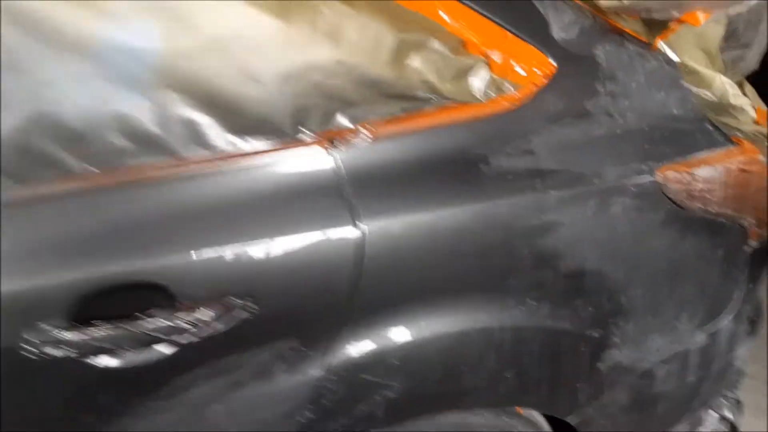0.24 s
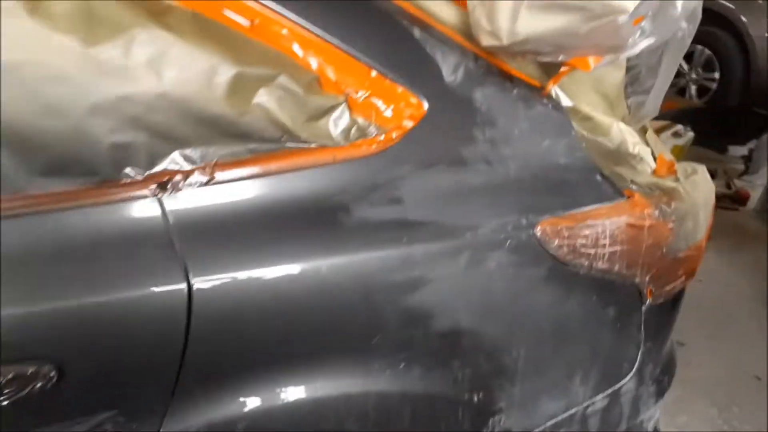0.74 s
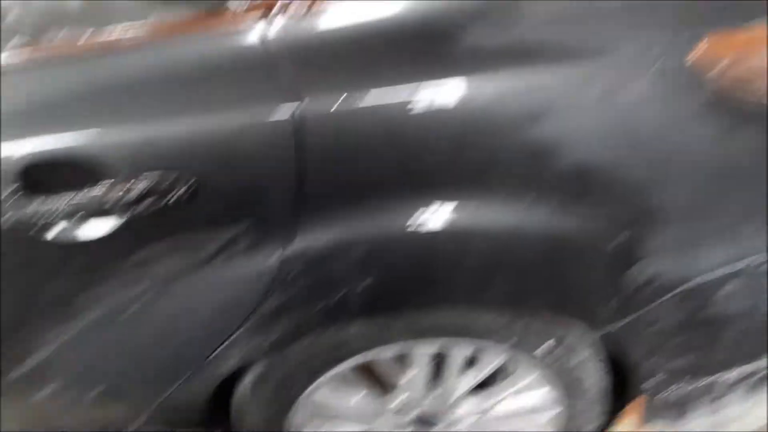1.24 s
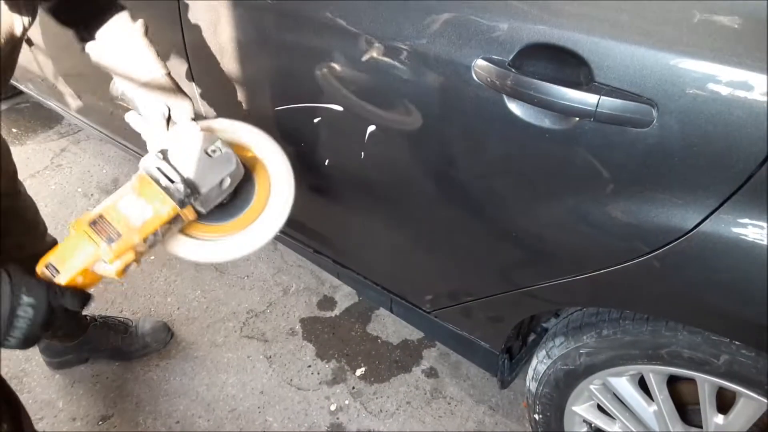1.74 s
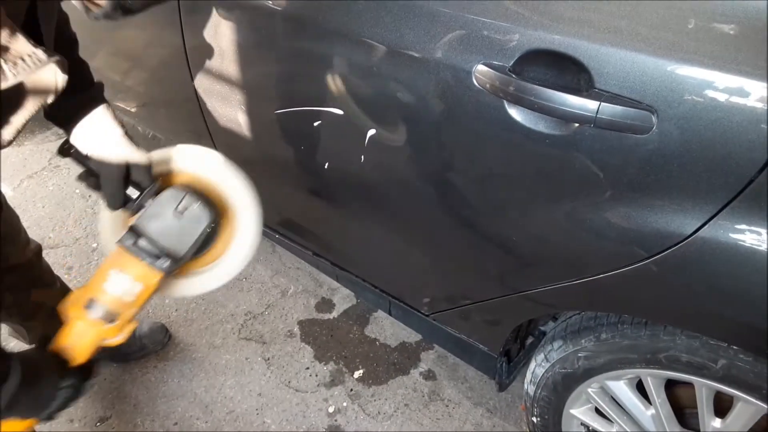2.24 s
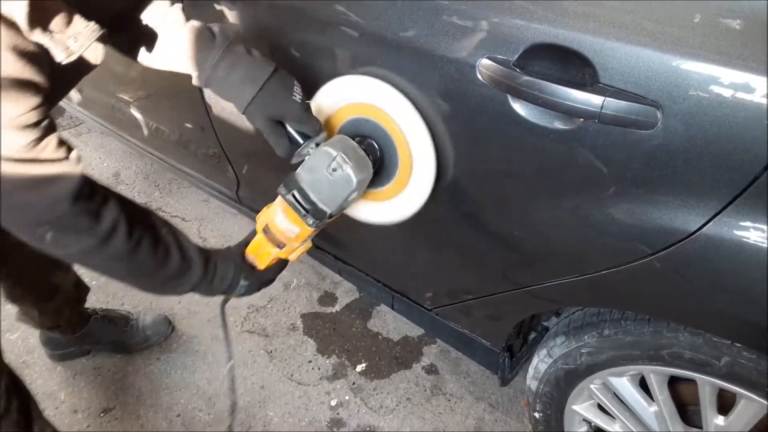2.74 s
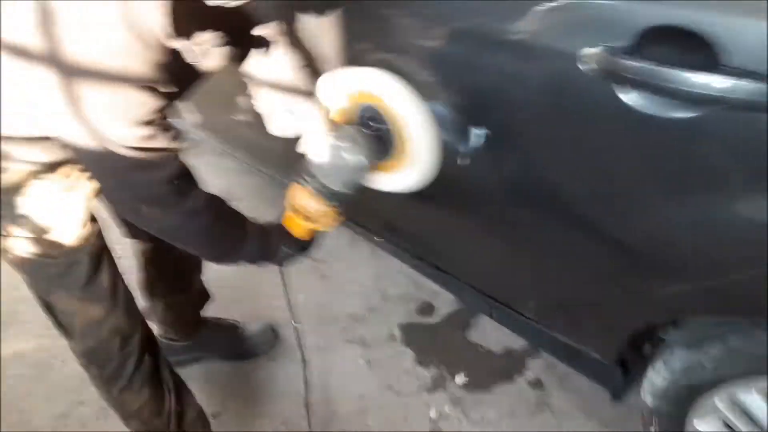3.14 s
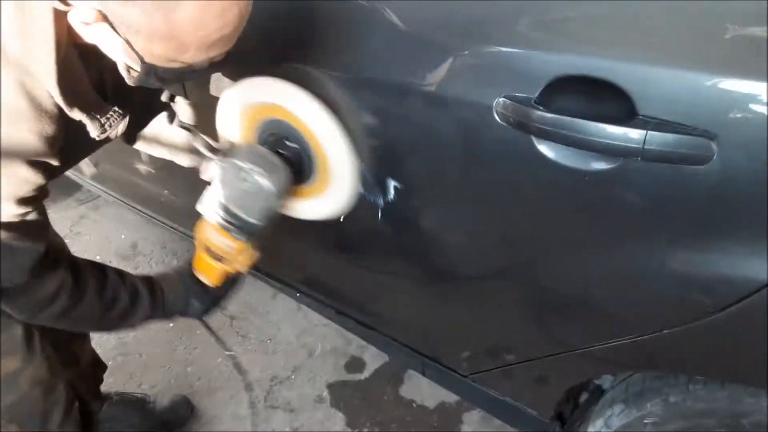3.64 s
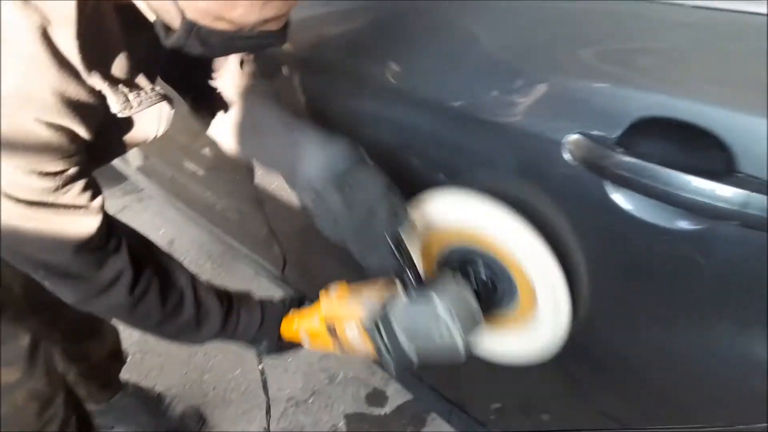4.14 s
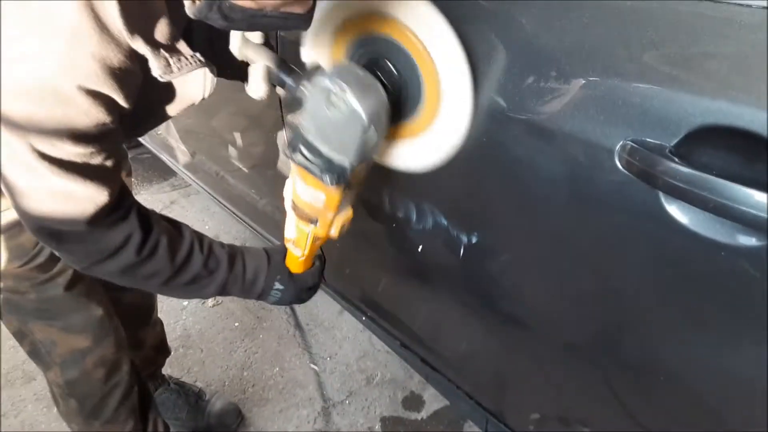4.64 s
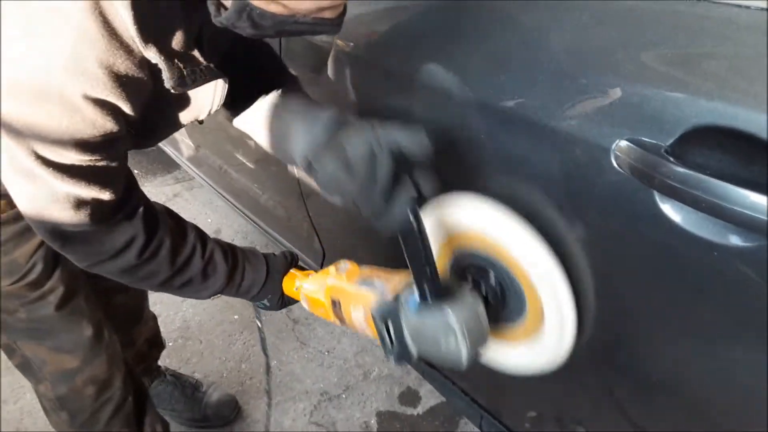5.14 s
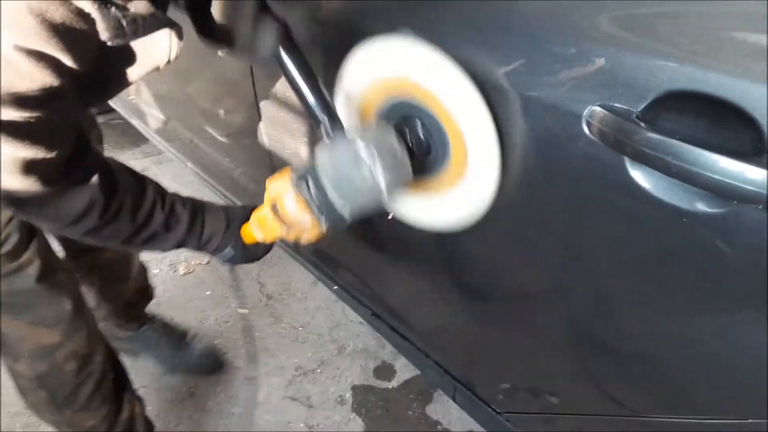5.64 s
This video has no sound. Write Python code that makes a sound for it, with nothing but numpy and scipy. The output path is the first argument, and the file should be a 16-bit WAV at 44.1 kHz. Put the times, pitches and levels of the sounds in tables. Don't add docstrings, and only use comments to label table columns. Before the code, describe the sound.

Low workshop hum and a few footstep scrapes give way suddenly to the loud, steady, wavering whir of an electric polisher on car paint.

```python
import sys
import numpy as np
from scipy import signal
from scipy.fft import rfft, irfft, next_fast_len
from scipy.io import wavfile
from scipy.ndimage import uniform_filter1d, map_coordinates

SR = 44100
rng = np.random.default_rng(int(sys.argv[2]) if len(sys.argv) > 2 else 0)


def magnitude_from_level(level_db):
    exponent = np.asarray(level_db, float) / 20
    return 10 ** exponent


def file_out(sig):
    cols = np.atleast_2d(sig).T
    lim = np.clip(cols, -1, 1)
    pcm = np.round(lim * 32767).astype(np.int16)
    wavfile.write(sys.argv[1], SR, pcm)


N = 260190
T = np.arange(N) / SR
MAINS_HZ = 120

# [f/Hz, correlation]
SHOP_ALIKE = [(60, 0.35), (130, 0.98), (290, 0.85), (640, 0.49), (1410, -0.04), (3100, 0.021), (6820, 0.0),
              (15000, 0.024)]
# [f/Hz, correlation]
TOOL_ALIKE = [(60, 0.19), (130, 0.69), (290, 0.78), (640, 0.76), (1410, 0.29), (3100, 0.042),
              (6820, 0.0084), (15000, 0.01)]
# [t/s, length/s, extra hunting/dB]
HUNTS = [
    (1.45, .2, 4),
    (3.08, .3, 7),
    (4.52, .36, 3),
    (5.2, .2, 5),
]


def unit(x):
    return x / np.sqrt(np.mean(x ** 2) + 1e-20)


def along(points, hz):
    f, v = np.transpose(points)
    return np.interp(np.log(hz + 1), np.log(f + 1), v)


def curves(rows):
    s, *cols = np.transpose(rows)
    return [np.interp(T, s, c) for c in cols]


def wobble(rate):
    return map_coordinates(rng.standard_normal(N // 400), [T * rate])


def swells(rows, rest_db):
    bumps = sum(magnitude_from_level(db) * np.exp(-np.abs(2 * (T - s) / length) ** 3) for s, length, db in rows)
    return 20 * np.log10(magnitude_from_level(rest_db) + bumps)


def filtered(x, response):
    m = next_fast_len(N + 8192)
    return irfft(rfft(x, m) * response(np.fft.rfftfreq(m, 1 / SR)), m)[..., :N]


def rush(spectrum, alike, patchy_db, gate=1.0):
    def mid_side_share(hz):
        turn = np.arccos(np.clip(along(alike, hz), -1, 1)) / 2
        return np.array([np.cos(turn), np.sin(turn)])

    mid, side = filtered(gate * rng.standard_normal((2, N)), mid_side_share)
    z = signal.stft(np.array([mid + side, mid - side]), nperseg=512)[2]
    field = uniform_filter1d(rng.standard_normal(z.shape), size=3, axis=1)
    field = uniform_filter1d(field, size=20, axis=2)
    field = field + field.mean(axis=0) * 0.5
    gain = magnitude_from_level(patchy_db * np.clip(unit(field), -2.5, 2.5))
    patched = signal.istft(z * gain, nperseg=512)[1][:, :N]
    return unit(filtered(patched, lambda hz: magnitude_from_level(along(spectrum, hz))))


def tone(phase, db, side_db, sway_db, shiver=.6):
    mid = magnitude_from_level(db + 3) * np.sin(phase + rng.uniform(0, 6) + shiver * wobble(25))
    side = magnitude_from_level(side_db + 5.5 + sway_db * wobble(4.95)) * np.sin(phase + 1.95 * wobble(2.946))
    return np.array([mid + side, mid - side])


def buffer():
    # [t/s, f/Hz]
    shaft = [(1.39, 175), (2.4, 175.2), (2.52, 174.6), (2.6, 175.1), (2.95, 174.6), (3.06, 172.4),
             (3.43, 171.4), (3.62, 172.8), (3.72, 171.8), (3.9, 171.8), (4.1, 173.6), (4.4, 173.6),
             (4.55, 171), (4.65, 171.6), (5.0, 172.2), (5.1, 173), (5.45, 173.6), (5.9, 173)]
    free_hz = 175
    load = free_hz - curves(shaft)[0]
    hunting = magnitude_from_level(swells(HUNTS, 0)) * (.17 * wobble(18) + .42 * wobble(60))
    shaft_hz = free_hz - load + hunting + .2 * wobble(8)
    turn = 2 * np.pi * np.cumsum(shaft_hz) / SR
    noise = off_the_floor(off_the_door(motor_noise(turn, load)))
    tool = whine(turn, load) + ticks() + slaps() + noise + door_drum() + rattle(turn)
    return filtered(tool, lambda hz: 1 / (1 + (88 / (hz + 1)) ** 16.0))


def whine(turn, load):
    # [t/s, length/s, level/dB]
    mesh_swells = [(2.2, 0.18, -32.5), (2.82, 0.27, -31), (3.05, 0.11, -31), (1.6, 0.4, -55),
                   (3.78, 0.21, -43), (4.11, 0.19, -36), (4.36, 0.24, -36.5), (4.93, 0.3, -31.5),
                   (5.3, 0.4, -43), (5.65, 0.27, -41)]
    # [t/s, length/s, level/dB]
    band_swells = [(1.6, 0.2, -39), (1.98, 0.27, -35.5), (2.7, 0.48, -40), (3.07, 0.22, -28.5),
                   (3.39, 0.29, -36), (3.65, 0.15, -35), (3.99, 0.36, -35), (4.35, 0.075, -34),
                   (4.6, 0.28, -37), (4.96, 0.24, -31), (5.36, 0.29, -32.5), (5.62, 0.12, -34)]
    # [t/s, length/s, level/dB]
    order_19_swells = [(1.62, 0.24, -38), (2.2, 0.18, -28.5), (2.46, 0.11, -27.5), (2.75, 0.24, -34.5),
                       (2.93, 0.22, -33), (3.2, 0.23, -30.5), (3.61, .16, -29.5), (3.75, .1, -40),
                       (3.93, 0.24, -32), (4.2, 0.36, -29.5), (4.44, .12, -31), (4.6, 0.26, -32.5),
                       (4.97, 0.15, -26), (5.15, 0.11, -23), (5.35, 0.2, -39), (5.55, 0.23, -30.5),
                       (5.8, 0.27, -32.5)]
    # [t/s, length/s, level/dB]
    order_25_swells = [(1.56, 0.22, -41), (1.85, 0.081, -47), (2.4, 0.18, -37), (2.76, 0.084, -30),
                       (3.12, .1, -36.5), (3.31, 0.12, -27), (3.62, 0.48, -30), (4.15, 0.32, -33),
                       (5.12, 0.43, -32.5), (5.46, 0.2, -32), (5.83, 0.091, -34)]
    rotor_swells = {6: [(1.62, 0.24, -37.5), (1.82, 0.26, -41.5), (2.44, 0.094, -39), (3.08, 0.29, -40),
                    (3.92, 0.2, -37), (4.2, 0.54, -41), (5.07, 1, -44.5)], 7: [(1.8, 0.25, -45),
                    (2.45, .1, -43), (3.81, 0.37, -36), (4.6, 0.57, -42)], 8: [(2.88, 1, -46),
                    (3.9, 0.18, -46), (3.95, .1, -44), (4.75, 0.42, -35.5)], 46: [(1.8, 0.15, -42),
                    (2.52, 0.35, -34.5), (1.5, 0.28, -49), (4.05, 0.1, -47), (4.58, 0.15, -36),
                    (5.22, 0.2, -41), (5.8, .15, -49)]}
    # [multiple of shaft speed, level/dB]
    orders_db = [(4, -49), (5, -46), (9, -49), (10, -45), (11, -45), (13, -50), (14, -49), (17, -43),
                 (18, -41), (20, -44), (21, -48), (22, -45), (23, -43), (24, -43), (26, -43), (27, -46),
                 (28, -49), (30, -50), (31, -50), (35, -55), (36, -54), (38, -57), (42, -56), (49, -51)]
    order_swells = {18: [(3.3, .15, -40), (3.9, .4, -37), (4.22, 0.11, -35), (4.44, 0.18, -39),
                    (4.9, 0.23, -33)], 20: [(3.19, 0.17, -30), (4.35, .1, -42), (4.6, 0.33, -33)],
                    22: [(1.5, .3, -46), (4.15, .1, -35), (5.8, 0.18, -46)], 17: [(1.42, 0.067, -39),
                    (3.45, 0.13, -37), (4.5, 0.16, -34)], 23: [(1.7, 0.63, -50), (4, 0.79, -47),
                    (5.2, 0.25, -38)], 24: [(1.45, 0.11, -38), (1.8, 0.16, -43), (2.6, 0.25, -41),
                    (4.5, 0.12, -36), (5.3, .2, -44)], 49: [(5.27, 0.38, -36)], 5: [(4.8, 1, -54)],
                    26: [(2.36, 0.086, -32), (4.05, 0.13, -35), (4.62, 0.28, -33.5), (5.32, 0.45, -32)]}
    mains = 2 * np.pi * MAINS_HZ * T

    def flutter():
        return 1.5 * wobble(35) + 2.8 * wobble(70) + .2 * wobble(7) - 1

    strong = [(12 * turn, swells(mesh_swells, -39), -39),
              (12 * turn + mains, swells(band_swells, -45), -39),
              (19 * turn, swells(order_19_swells, -47.0), -41),
              (25 * turn, swells(order_25_swells, -39.5), -38)]
    out = sum(tone(phase, db + flutter(), side_db, sway_db=-4.0) for phase, db, side_db in strong)
    for k, rows in rotor_swells.items():
        out = out + tone(k * turn, swells(rows, -46) + flutter(), -54.5, sway_db=10.5)

    unbalance_db = swells([(2.4, .6, -55), (3.4, .7, -52), (3.9, .35, -47), (4.3, .1, -51), (4.6, .2, -53),
                           (5.03, .3, -50)], -61 + load)
    out = out + tone(turn, unbalance_db + 1.2 * wobble(7), -68, sway_db=1, shiver=.2)
    out = out + tone(2 * turn, -51 - 2 * load + 1.5 * wobble(12), -58, sway_db=1, shiver=.3)
    for k, db in ((-1, -44), (2, -46), (3, -47)):
        out = out + tone(12 * turn + k * mains, db + 3.5 * wobble(4), db - 2, sway_db=4)

    for k, db in orders_db:
        rest_db = db + (k > 21) * (3 - 1.3 * load)
        level_db = swells(order_swells.get(k, []), rest_db) - 1.8 + wobble(4) + 3.5 * wobble(30)
        out = out + tone(np.round(k) * turn, level_db, db - 4, sway_db=3)
    return out


def motor_noise(turn, load):
    # [f/Hz, density/dB]
    pad = [(80, -60), (135, -11), (180, -3), (236, 1.5), (301, -1), (360, 2), (476, -13.5), (600, -52),
           (780, -31), (1300, -90)]
    # [f/Hz, density/dB]
    housing = [(130, -33), (400, -11), (666, -4), (922, -2.5), (1020, 1), (1230, 2), (1640, 2),
               (2200, -5.5), (2860, -3.5), (4800, -90)]
    # [f/Hz, density/dB]
    gears = [(900, -76), (1500, -0.5), (2000, -6.5), (2500, -2.5), (3230, 1.5), (3650, -1.5), (4300, -17),
             (7000, -70)]
    # [f/Hz, density/dB]
    bearing = [(2000, -70), (3300, -14), (3800, -2.5), (4340, -4.5), (5000, -3), (5900, -9), (6500, -19.5),
               (9000, -62)]
    # [f/Hz, density/dB]
    fan = [(3500, -70), (5500, -20), (6200, -5), (7200, -3.5), (8400, -0.5), (9500, -5.5), (10500, -6.5),
           (13000, -2.5), (14500, -9.5), (16000, -3.5)]
    # [f/Hz, density/dB]
    vent = [(8500, -71), (9900, -7.5), (10500, 0.5), (10950, 2.5), (11500, 2.5), (12200, -7), (14000, -41)]
    # [f/Hz, density/dB]
    skin = [(350, -58), (480, -17), (600, 4), (800, 6), (950, 7.5), (1300, -60)]
    # [t/s, length/s, level/dB]
    skin_swells = [(1.6, 0.53, -46), (2.05, 0.72, -44), (2.55, 0.14, -57), (4.45, 0.57, -41),
                   (5.0, 0.41, -43)]
    # [t/s, length/s, rub level/dB]
    grabs = [
        (1.42, 0.032, -46),
        (3.1, 0.19, -49),
        (4.56, 0.87, -47),
        (5.23, 0.15, -56),
    ]
    # [t/s, nearness/dB, gear case turned to us/dB, vents turned to us/dB]
    pose = [(1.4, -0.5, -1.5, 0), (1.7, -0.5, 0, -2), (2.0, -1.5, 0, -3), (2.2, -0.5, -1.5, 1),
            (2.55, 0.5, 0.5, -3), (2.78, 0, 0.5, 1.5), (3.05, 0.5, 1, -4), (3.3, -2, -0.5, -0.5),
            (3.55, -2, -2.5, -5), (3.8, 0.5, -0.5, -3), (4.08, 0.5, -1.5, -1), (4.45, 1, -1.5, -1),
            (4.7, -0.5, -2, -1.5), (5.0, -0.5, -1, 0), (5.22, 0.5, -1.5, 5), (5.46, -0.5, -2, 5),
            (5.65, -0.5, -2, -1), (5.9, 0, -2, 1.5)]
    # [f/Hz, left over right/dB]
    balance = [(60, -8), (110, 12.5), (200, 1), (380, 6), (700, 0.5), (1290, -1.5), (2380, 4.5),
               (4400, -2.5), (8120, 0.5), (15000, -2)]
    # [t/s, left over right/dB]
    swing = [(1.42, 2), (1.63, 1), (1.67, 1.5), (2.79, 1), (3.0, 1), (3.83, 0), (4.99, -2), (5.5, -1.5),
             (5.57, -0.5), (5.9, -1.5)]

    near_db, case_db, vents_db = curves(pose)
    shaft_beat = np.cos(turn) + .6 * np.cos(2 * turn + 1.3)
    mains_beat = .35 * np.cos(2 * np.pi * MAINS_HZ * T)
    pad_beat = .55 * np.cos(.305 * turn)
    grab = 0.31 * wobble(11)

    def beat(depth_db):
        return magnitude_from_level(depth_db * (shaft_beat + mains_beat + pad_beat))

    def spikes(depth_db):
        fast = unit(uniform_filter1d(rng.standard_normal(N), size=60))
        return magnitude_from_level(depth_db * (wobble(90) + 0.5 * fast))

    def layer(db, spectrum, patchy_db, beat_db, spike_db):
        return magnitude_from_level(db) * rush(spectrum, TOOL_ALIKE, patchy_db, gate=beat(beat_db) * spikes(spike_db))

    rub_db = swells(grabs, -42.7 + 0.3 * load) + 0.5 * wobble(10)
    out = magnitude_from_level(rub_db) * rush(pad, TOOL_ALIKE, patchy_db=.9)
    housing_db = -29.0 + 1.2 * near_db + 0.088 * load + 1.2 * grab
    out = out + layer(housing_db, housing, patchy_db=2.0, beat_db=0.46, spike_db=1.0)
    gears_db = -27.5 + 0.53 * near_db + 0.85 * case_db + 0.078 * swells(HUNTS, 0) + 0.67 * load + 0.43 * grab
    out = out + layer(gears_db, gears, patchy_db=0.0, beat_db=1.3, spike_db=1.3)
    bearing_db = -28.5 + 1.1 * near_db - 1.53 * case_db + 0.23 * grab
    out = out + layer(bearing_db, bearing, patchy_db=2.0, beat_db=1.3, spike_db=0.96)
    fan_db = -24.0 + 0.74 * near_db - 0.018 * vents_db + 1.3 * grab
    out = out + layer(fan_db, fan, patchy_db=0.2, beat_db=0.42, spike_db=0.86)
    vent_db = -29.5 + 0.9 * vents_db + 0.34 * grab
    out = out + layer(vent_db, vent, patchy_db=4.0, beat_db=0.85, spike_db=1.0)
    out = out + magnitude_from_level(swells(skin_swells, -54.5) + grab) * rush(skin, TOOL_ALIKE, patchy_db=-1.5)
    out = filtered(out, lambda hz: magnitude_from_level(np.outer([.5, -.5], along(balance, hz))))
    return out * magnitude_from_level(np.outer([.5, -.5], curves(swing)[0] + .3))


def off_the_door(x):
    lag = SR * np.array([.0016 + 0.000391 * wobble(1.5), 0.0023 + 0.000402 * wobble(1.4)])
    at = np.arange(N)
    echo = [np.interp(at - late, at, ear) for late, ear in zip(lag, x)]
    return 1.133 * x + 0.22 * np.array(echo)


def off_the_floor(x):
    lag_s, share, top_hz = .00161, .45, 1300
    return filtered(x, lambda hz: 1 + share * np.exp(-2j * np.pi * hz * lag_s) / (1 + (hz / top_hz) ** 4))


def rattle(turn):
    # [t/s, length/s, level/dB]
    facing_left = [(3.35, .3, -33), (3.9, 0.51, -38), (4.54, 0.22, -25), (5.25, .1, -36)]
    # [t/s, length/s, level/dB]
    facing_right = [(1.52, 0.31, -27), (1.9, 0.31, -30), (2.39, 0.19, -27.5), (2.72, 0.32, -27.5),
                    (3.3, .2, -35), (3.85, 0.14, -36), (4.1, .3, -30.5), (4.5, .3, -40), (5.2, .25, -27),
                    (5.5, .2, -30)]
    ring_hz, width_hz, scatter_db, jitter_s = 4400, 520, 4, .00015
    at = np.flatnonzero(np.diff(np.floor(turn / (2 * np.pi) + .5)))
    size, late = rng.standard_normal((len(at), 2)).T
    at = np.clip(at + np.round(late * jitter_s * SR).astype(int), 0, N - 1)
    knocks = np.bincount(at, magnitude_from_level(scatter_db * np.clip(size, -2, 1)), N)

    def case(f):
        return (1j * f * width_hz / (ring_hz ** 2 - f * f + 1j * f * width_hz)) ** 2

    return unit(filtered(knocks, case)) * magnitude_from_level([swells(facing_left, -58), swells(facing_right, -35.5)])


def slaps():
    # [f/Hz, t60/s]
    low_ring, high_ring = [(4600, 0.0085), (10950, 0.011)]
    # [t/s, peak level/dB, high ring over low ring/dB]
    hits = [(1.401, -11, 0), (1.585, -8, -12), (1.599, -8, -12), (1.89, -15, -12), (1.969, -7, -12),
            (2.015, -12, -12), (2.333, -8, -12), (2.351, -10, -12), (2.367, -3, -10), (2.38, -9, -12),
            (2.431, -10, -12), (3.816, -13, -12), (4.671, -6, -12), (5.1615, -4, -8), (5.1788, -5, -4),
            (5.196, -9, 7), (5.22, -6, -3), (5.235, -11, 5), (5.2525, -10, 6), (5.288, -13, 3),
            (5.3118, -7, 4), (5.3555, -15, 3), (5.3635, -15, 3), (5.4445, -9, 7), (5.454, -12, 6),
            (5.4613, -9, 5), (5.478, -9, -1), (5.4972, -7, -5)]

    def ring(t, hz, t60):
        return magnitude_from_level(-60 * t / t60) * np.sin(2 * np.pi * hz * t) * (1 - np.exp(-t / 0.00032))

    out = np.zeros(N)
    for s, db, high_db in hits:
        t = np.maximum(T - s, 0)
        out = out + magnitude_from_level(db) * (ring(t, *low_ring) + magnitude_from_level(high_db) * ring(t, *high_ring))
    return out * magnitude_from_level([[-10], [0]])


def ticks():
    # [t/s, f/Hz, peak level/dB]
    hits = [(1.476, 4400, -20), (1.8, 4270, -19), (2.266, 4400, -19), (3.904, 4300, -18),
            (4.604, 4380, -21), (5.88, 4400, -13), (2.368, 4560, -20), (2.641, 2300, -16),
            (3.007, 1680, -12), (3.914, 1320, -13), (4.546, 2730, -9.5), (5.173, 3280, -13),
            (5.443, 4480, -26)]
    out = np.zeros(N)
    for s, hz, db in hits:
        t = np.maximum(T - s, 0)
        out = out + magnitude_from_level(db + 4.5) * np.sin(2 * np.pi * hz * t) * (1 - np.exp(-t / 0.00049)) * magnitude_from_level(-60 * t / 0.012)
    return out * magnitude_from_level([[1.5], [-1.5]])


def door_drum():
    # [f/Hz, density/dB]
    panel = [(25, -30), (60, -28), (90, 3), (125, 9), (160, 1), (200, -53)]
    drum_db = swells([(1.42, .08, -52), (2.82, .1, -54)], -78 + 24 * (T > 2.97))
    return magnitude_from_level(drum_db + 1.8 * wobble(16)) * rush(panel, TOOL_ALIKE, patchy_db=.5)


def scuffs():
    # [t/s, level/dB, drag/s, fade/s, knock over drag/dB]
    steps = [
        (.166, -59, .01, .01, -2),
        (0.172, -42, 0.019, 0.0092, 4.5),
        (.2, -44, .09, .03, -18),
        (.257, -55, 0.017, .012, -1),
        (.33, -45.5, .045, .015, -13),
        (.428, -44, .008, 0.014, -13),
        (.862, -48, .004, .003, -6),
        (0.871, -35, 0.065, 0.027, -15),
        (.96, -48, 0.043, .03, -8),
    ]
    # [f/Hz, density/dB]
    sole = [(880, -36), (1500, -3), (2740, -2.5), (3660, -3), (5540, -4.5), (5880, -8), (8400, -7.5),
            (16000, -5)]
    thud = [(900, -25), (1300, -6), (1480, 0), (1750, -9), (2600, -12), (4500, -24)]  # f/Hz, density/dB
    drag, knock = np.zeros(N), np.zeros(N)
    for s, db, hold, fade, knock_db in steps:
        t = np.maximum(T - s, 0)
        shape = (1 - np.exp(-t / 0.0019)) * np.exp(-np.maximum(t - hold, 0) / fade)
        drag = drag + magnitude_from_level(db) * shape
        knock = knock + magnitude_from_level(db + knock_db) * shape
    grit = rush(sole, SHOP_ALIKE, patchy_db=3.0, gate=magnitude_from_level(2.7 * rng.standard_normal(N)))
    return drag * grit + knock * rush(thud, [(1000, .3)], patchy_db=1.5)


def shop():
    # [f/Hz, level/dB, unsteadiness/dB]
    hum_lines = [(71, -52, 2), (120, -35.6, .25), (142.2, -34.3, .4), (291, -49, 2), (409, -54, 3)]
    # [f/Hz, resting level/dB]
    overtones = [
        (240, -42.5),
        (360, -47),
        (429, -50),
    ]
    # [t/s, length/s, level/dB]
    buzzes = [
        (0.204, 0.19, -38),
        (0.733, 0.4, -35.5),
        (1.21, 0.33, -30),
    ]
    # [f/Hz, density/dB]
    air_spectrum = [(15, -60), (28, -22), (69, -17), (130, -5), (180, -8), (250, -6.5), (482, -16.5),
                    (816, -17.5), (1230, -22.5), (2090, -25.5), (6000, -52), (7800, -75), (13200, -120)]
    # [f/Hz, density/dB]
    hiss_spectrum = [(1700, -35), (3000, -3.5), (5330, -5.5), (6300, -11), (9730, -15), (12400, -7.5),
                     (16000, -14)]

    hum = np.zeros(N)
    for hz, db, shake_db in hum_lines:
        level_db = db + 2.5 + 1.6 * T + shake_db * wobble(8)
        hum = hum + magnitude_from_level(level_db) * np.sin(2 * np.pi * hz * T + .06 * wobble(6))
    rises = (buzzes,
             [(.07, 0.15, -48), (.4, .36, -50)],
             [(.1, .25, -56), (.4, 0.12, -59), (.95, 0.5, -45)])
    for (hz, rest_db), rows in zip(overtones, rises):
        level_db = swells(rows, rest_db) + 1.5 + 0.31 * wobble(6.2)
        hum = hum + magnitude_from_level(level_db) * np.sin(2 * np.pi * hz * T + hz / 2000 * wobble(11.4))
    air = magnitude_from_level(-35) * rush(air_spectrum, SHOP_ALIKE, patchy_db=0.5)
    hiss = magnitude_from_level(-50.5) * rush(hiss_spectrum, SHOP_ALIKE, patchy_db=3.0)
    return (hum + air) * magnitude_from_level([[1.1], [-1.1]]) + hiss


def scene():
    # [t/s, level/dB]
    lead_in = [
        (.98, -50),
        (1.1, -34.5),
        (1.36, -25.5),
    ]
    cut_out, cut_in = 1.3632, 1.3955
    first = np.where(T < cut_out, 1, magnitude_from_level(-28 - 500 * (T - cut_out)))
    second = np.where(T > cut_in, 1, magnitude_from_level(-40 - 12000 * (cut_in - T)))
    second = second + magnitude_from_level(curves(lead_in)[0]) * (T < cut_out)
    return (shop() + scuffs()) * first + buffer() * second


def starve(x, knee_db, depth):
    def smooth(p, bins, frames):
        return uniform_filter1d(uniform_filter1d(p, size=bins, axis=1), size=frames, axis=2)

    z = signal.stft(np.array([x[0] + x[1], x[0] - x[1]]) / 2, nperseg=1024)[2]
    near = np.abs(smooth(np.abs(z) ** 2, bins=3, frames=3)) + 1e-20
    dip_db = 10 * np.log10(near) - 10 * smooth(np.log10(near), bins=70, frames=6)
    gain = magnitude_from_level(np.clip(depth * (dip_db - knee_db), -14, 0))
    mid, side = signal.istft(z * gain, nperseg=1024)[1][:, :N]
    return np.array([mid + side, mid - side])


def roll_off(x):
    return signal.sosfilt(signal.butter(12, 16090, fs=SR, output="sos"), x)


def record(dry):
    top_hz = 15760
    thinned = starve(dry, knee_db=-3, depth=2.4)
    mix = filtered(thinned, lambda hz: np.clip((top_hz - hz) / 60 + .5, 1e-3, 1))
    return roll_off(mix)


dry = scene()
out = record(dry)
file_out(out)
```